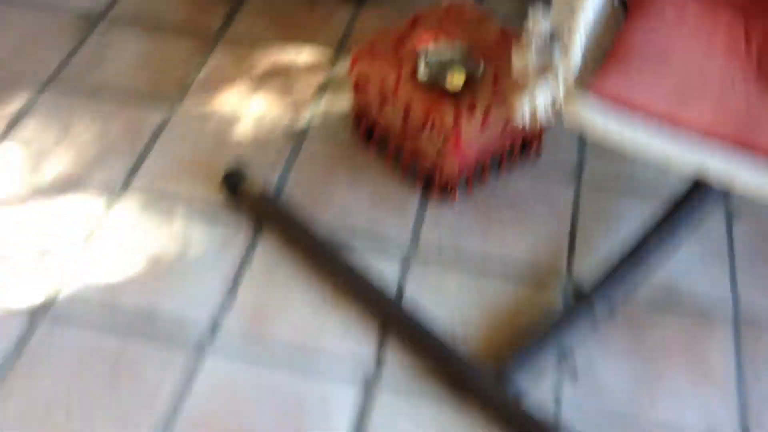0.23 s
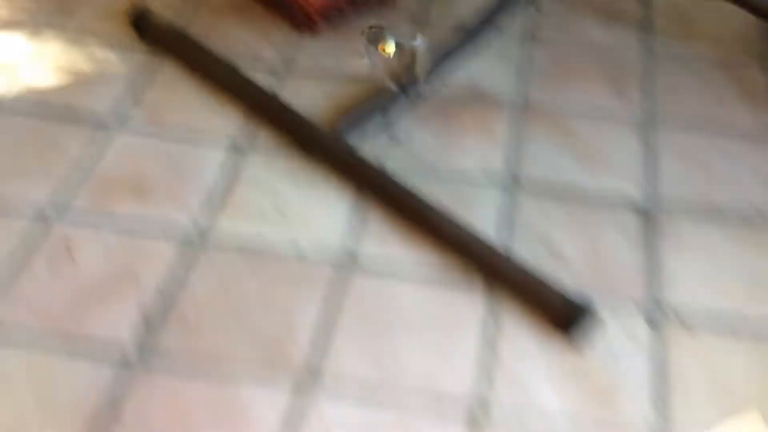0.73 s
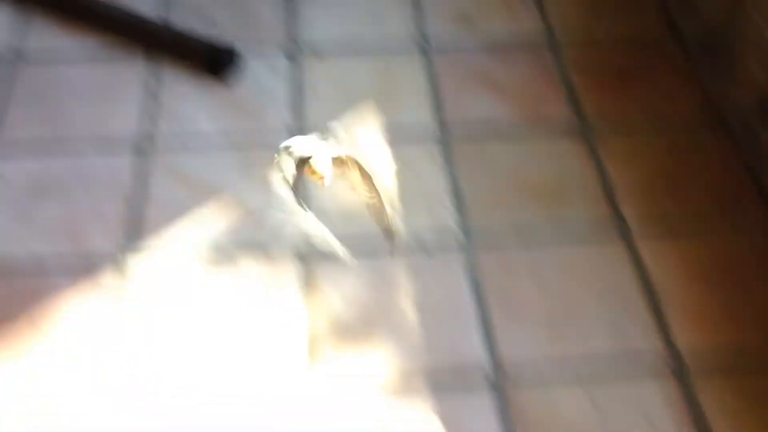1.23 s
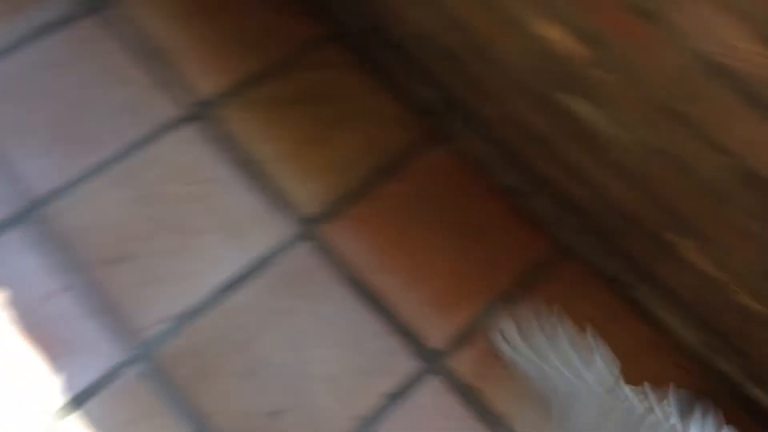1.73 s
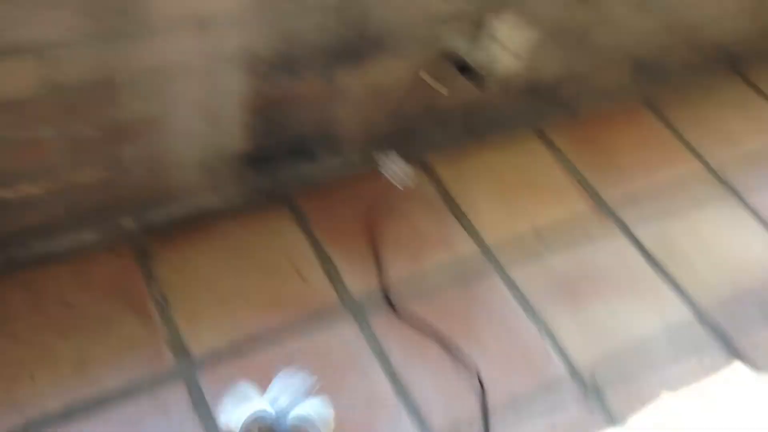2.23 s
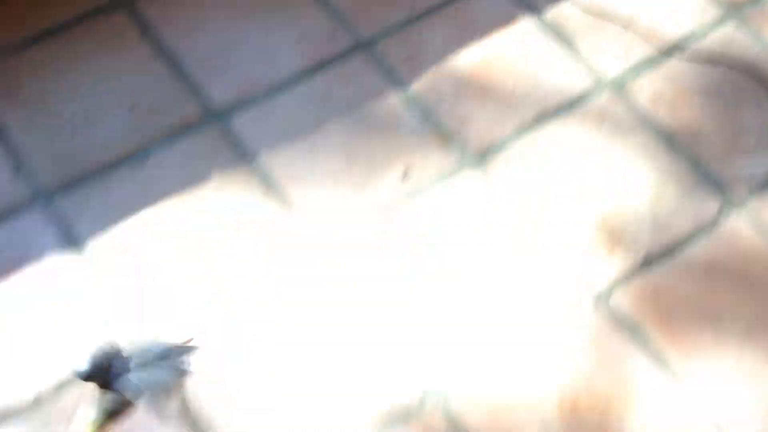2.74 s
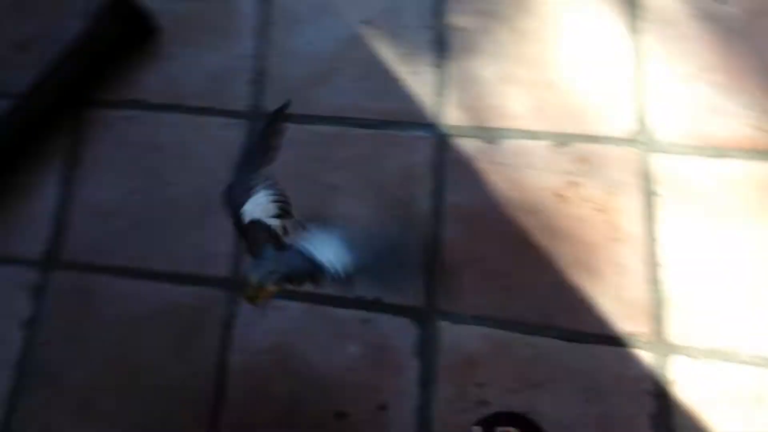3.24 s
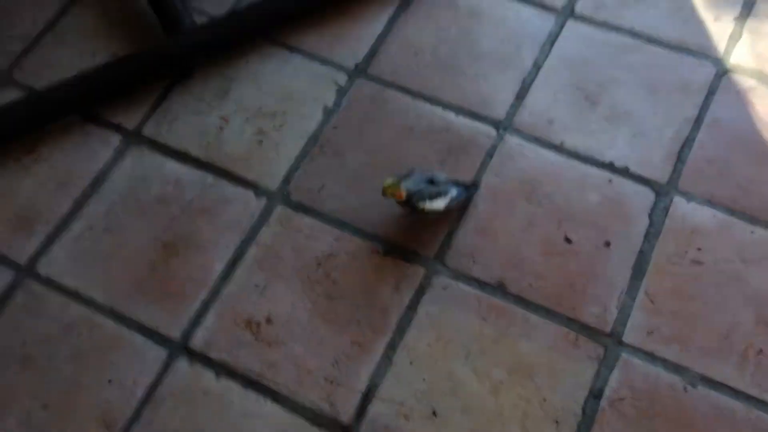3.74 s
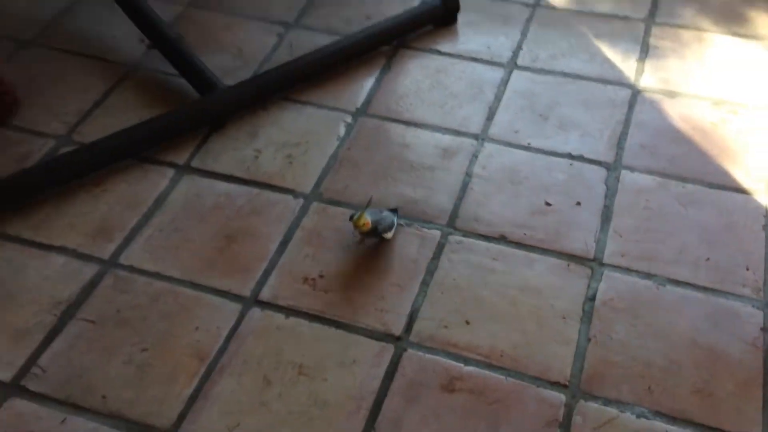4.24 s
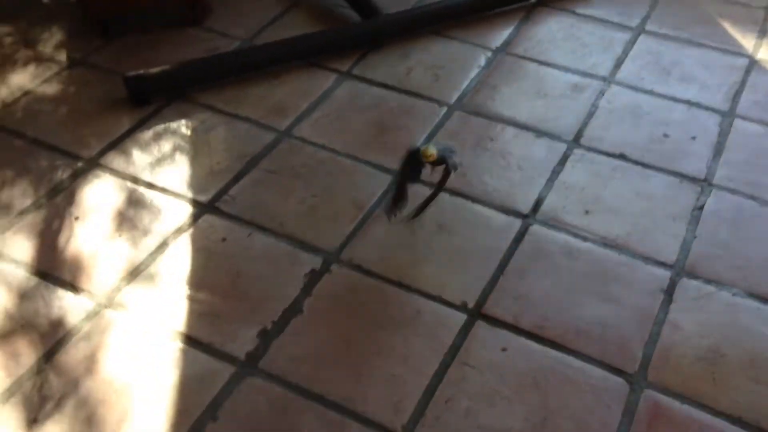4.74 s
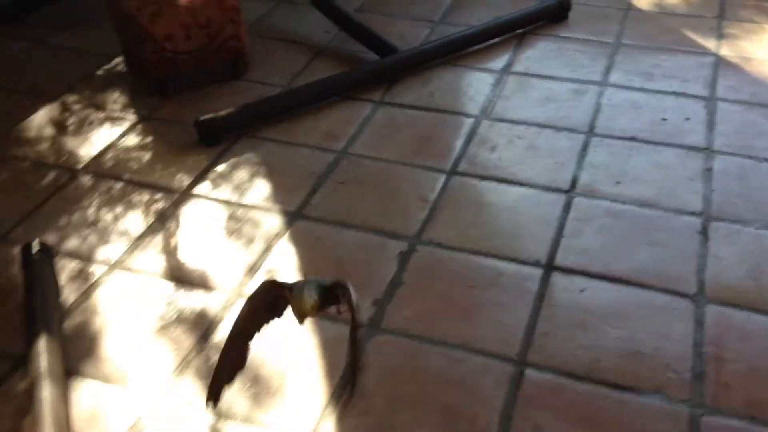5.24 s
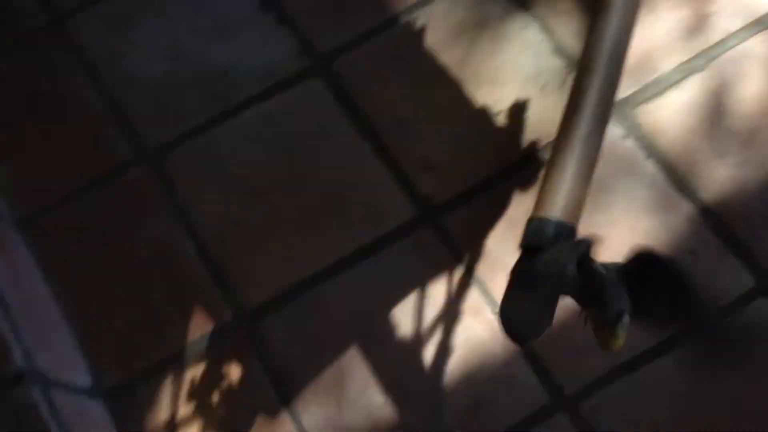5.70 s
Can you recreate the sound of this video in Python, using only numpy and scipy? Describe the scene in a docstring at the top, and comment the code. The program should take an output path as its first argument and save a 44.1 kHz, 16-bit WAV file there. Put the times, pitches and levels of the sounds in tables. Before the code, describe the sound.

Soft sandal steps shuffle and scrape across an echoing tiled porch, heard from a handheld microphone. A cockatiel chirps right at the start, then flutters by closely, its wings swishing and puffing air. After more steps and a sandal slap it chirps again, a clean whistle breaking into a rasp. A sharper slap and one tiny sole squeak follow, over quiet outdoor air, low hum, hand rumble and a far engine.

```python
"""A cockatiel chirps twice on a tiled, echoing porch, each clean whistle breaking into a rasp.
Between the chirps it flaps close past, with swishing feathers and low puffs of air.
Someone in sandals follows it: the soles pad and scuff over the tiles, slap down twice, popping out
trapped air, and squeak once. Underneath lie outdoor air, a faint hum, a far engine and the rumble
of a hand moving the microphone."""
import sys
import numpy as np
from scipy import signal
from scipy.fft import rfft, irfft, next_fast_len
from scipy.io import wavfile
from scipy.ndimage import uniform_filter1d

SR = 44100
rng = np.random.default_rng(int(sys.argv[2]) if len(sys.argv) > 2 else 0)


def pcm_store(signal):
    """Save signal as 16-bit PCM."""
    levels = np.round(np.clip(np.atleast_2d(signal), -1, 1) * 32767)
    wavfile.write(sys.argv[1], SR, levels.astype(np.int16).T)


N = 263277
TIME = np.arange(N) / SR

# the tune of the bird, one list per chirp (time [s], pitch [Hz])
CHIRP_PITCH = [
    [(.12, 1603), (.158, 1782), (.195, 1558), (.225, 1734), (.268, 1860), (.286, 1740), (.325, 1990)],
    [(4.097, 2178), (4.114, 1861), (4.19, 1883), (4.203, 1637), (4.228, 1684), (4.25, 1836), (4.275, 1752),
     (4.295, 1746)],
]
# its loudness, one list per chirp (time [s], lowest tone [dB], octave above [dB])
CHIRP_LEVEL = [
    [(.125, -51, -62), (.156, -36.5, -42), (.177, -37, -28.5), (.2, -38.5, -39), (.265, -44, -38.5),
     (.282, -48, -60), (.295, -36.5, -42.5), (.335, -36, -51.5)],
    [(4.075, -51, -80), (4.115, -29.5, -37.5), (4.136, -30.5, -47.5), (4.15, -47, -35.5),
     (4.175, -35.5, -62.5), (4.2, -46.5, -50), (4.226, -45, -48), (4.252, -30.5, -55), (4.29, -39.5, -41)],
]
# how each chirp turns rough (time [s], roughness [0-1], flutter at full roughness [x pitch], echo [dB])
CHIRP_BREAKS = [(.205, 0.6, 0.113, -6), (4.215, 0.64, 0.056, -4.5)]
# weak high tones of the bird's throat (multiple of the pitch, level against the octave [dB])
OVERTONES = [(3, -19.5), (4, -39), (5, -46), (6, -33), (7, -30), (8, -35)]
# wingbeats close to the microphone (time [s], relative dull rustle [dB], relative bright swish [dB])
WINGBEATS = [(1.728, -53, -51.5), (1.838, -51, -53.5), (1.93, -51.5, -51.5), (2.06, -54.5, -49),
             (2.174, -61, -45), (2.269, -52.5, -49), (2.385, -58.5, -63.5)]
# puffs of air on the microphone, mostly from the wings (time [s], level [dB])
PUFFS = [(1.146, -43.5), (1.576, -44.5), (1.803, -39.5), (1.847, -40.5), (1.903, -39.5), (1.95, -37.5),
         (3.638, -43)]

# rubs of soles and cloth (peak time [s], swell [s], relative scrape [dB], relative brush [dB])
SCUFFS = [(.007, 0.04, -56.5, -46.5), (.24, 0.18, -52.5, -51.5), (0.382, 0.022, -54.5, -50.5),
          (.915, 0.15, -54, -47), (1.51, 0.25, -51.5, -51), (2.578, 0.11, -55, -44.5),
          (2.863, 0.0092, -54, -47.5), (2.93, 0.089, -58, -47.5), (3.101, .028, -49, -41),
          (3.208, 0.037, -63, -53.5), (3.335, 0.037, -46.5, -50.5), (3.76, 0.027, -59.5, -52.5),
          (4.01, .11, -53, -45.5), (4.298, 0.0094, -34.5, -56), (5.149, 0.0091, -52, -57),
          (5.26, 0.03, -49, -48.5), (5.301, 0.014, -38, -54), (5.361, 0.1, -48.5, -49.5),
          (5.53, 0.15, -62, -58), (5.632, .011, -64, -54), (5.739, .016, -52.5, -49.5),
          (5.86, 0.12, -60, -56.5)]
# tone colour of a dull scrape and of a bright brush (frequency [Hz], relative level [dB])
SCRAPE_COLOUR = [(200, -19), (500, -21), (900, -5.5), (1600, 1), (2200, 0), (2900, -3), (4200, -3.5),
                 (7000, -18), (15000, -43)]
BRUSH_COLOUR = [(1100, -26), (1600, -5.5), (2200, 0.5), (3100, -2), (4500, 0.5), (6500, 0.5), (10000, -4.5),
                (15000, -15)]
# soft footsteps (time [s], heel tap [dB], thud [dB], thud pitch [Hz])
STEPS = [(.647, -33, -35, 282), (1.248, -33, -44, 300), (1.844, -35.5, -43, 436), (1.967, -49, -35.5, 303),
         (2.255, -45, -39.5, 337), (2.488, -57, -37.5, 300), (2.548, -26, -34, 358),
         (2.6603, -40, -26, 340), (2.755, -41, -36, 413), (3.796, -35.5, -65, 330),
         (5.724, -45, -35.5, 234)]
# brief narrow rasps near 2.2 kHz, on a wingbeat and on two scuffs (time [s], level [dB])
RASPS = [(2.18, -56), (3.095, -43.5), (4.045, -47.5)]
# hard sandal slaps; thump, sole and crack are set against the pop of air (time [s], relative level [dB],
# pop pitch [Hz], pop width [Hz], thump [dB], sole ring [dB], crack [dB], bass cut [Hz])
SLAPS = [(3.3313, -12.5, 860, 460, -10.5, -7.5, -10, 280), (4.3005, -3, 1230, 680, -11.5, -21, -12, 610)]

# tone colour of the outdoor air and of the hand's rumble (frequency [Hz], relative level [dB])
AIR_COLOUR = [(15, -28), (25, -1), (227, -3), (349, -1.5), (445, -9.5), (582, -2), (1140, -11.5),
              (2010, -13.5), (2700, -17), (3340, -16.5), (4260, -19.5), (6210, -24.5), (7300, -26),
              (9050, -28), (15500, -31)]
RUMBLE_COLOUR = [(25, -45), (45, -1.5), (80, 2), (160, -5), (330, -5), (600, -9.5), (1200, -30)]
# how strongly the hand moves (time [s], relative level [dB])
MOVEMENT = [(0, -56.5), (.7, -50.5), (1.6, -55), (1.9, -44.5), (2.17, -59.5), (2.6, -43.5), (3.05, -54.5),
            (4.3, -51.5), (5.55, -62), (5.75, -47.5), (5.97, -60)]
# tones of the hum (pitch [Hz], average level [dB])
HUM = [(120.5, -63.5), (282, -73.5), (329, -70.5), (361, -69), (547, -68)]
# a far engine gathering speed (time [s], firing pitch [Hz], level [dB])
ENGINE = [(3.7, 193, -71), (4.2, 206.2, -58.5), (4.65, 223.6, -62), (4.9, 229, -72)]
# how long the porch rings; "t60" is the time to fade by 60 dB (frequency [Hz], t60 [s])
PORCH_T60 = [(150, 0.23), (600, 0.4539), (1500, 0.62), (3500, 0.6464), (8000, 0.49), (15000, 0)]
# tone colour of its echo (frequency [Hz], relative level [dB])
PORCH_COLOUR = [(100, -14), (400, -3), (620, 0), (820, -4.5), (1000, -3), (1250, -2.5), (1750, 1.5),
                (2200, -9), (3200, 1.5), (7000, -1.5), (15000, 11)]


def from_db(db):
    """Turn decibels into a gain."""
    return 10 ** (np.asarray(db) / 20)


def rms_one(x):
    """Scale to an average power of one."""
    return x / np.sqrt(np.mean(x ** 2) + 1e-20)


def in_time(rows):
    """One curve over time per column, its points joined by straight lines."""
    times, *columns = np.transpose(rows)
    return [np.interp(TIME, times, column) for column in columns]


def during(rows, fade_s):
    """One while a table lasts, fading to zero outside it."""
    outside = np.maximum(rows[0][0] - TIME, TIME - rows[-1][0])
    return np.clip(1 - outside / fade_s, 0, 1)


def at_hz(points, hz):
    """Read a table at any frequency, with octaves evenly spaced."""
    known_hz, values = np.transpose(points)
    return np.interp(np.log(np.maximum(hz, 1)), np.log(known_hz), values)


def drift(rate_hz, hop=40):
    """A smooth random wobble of typical size one."""
    pole = np.exp(-2 * np.pi * rate_hz * hop / SR)
    noise = rng.standard_normal(N // hop + 2002)
    slow = signal.lfilter([1], [1, -2 * pole, pole * pole], noise)[2000:]   # let the filter settle
    return np.interp(np.arange(N) / hop, np.arange(len(slow)), rms_one(slow))


def coloured(noise, colour):
    """Give a noise its tone colour, at power one."""
    size = next_fast_len(N)
    hz = np.fft.rfftfreq(size, 1 / SR)
    gain = from_db(at_hz(colour, hz)) * (hz > 20)
    return rms_one(irfft(rfft(noise, size) * gain, size)[:N])


def band(x, low_hz, high_hz, order=2):
    """Let through what lies between two frequencies."""
    return signal.sosfilt(signal.butter(order, [low_hz, high_hz], "band", fs=SR, output="sos"), x)


def ring(hz, t60, rise_s):
    """A tone that swells quickly and dies away; peak one."""
    t = TIME[:SR // 5]
    wave = np.sin(2 * np.pi * hz * t) * from_db(-60 * t / t60) * (1 - np.exp(-t / rise_s))
    return wave / np.abs(wave).max()


def click(low_hz, high_hz):
    """A click between two frequencies; peak one."""
    wave = band(signal.unit_impulse(SR // 5), low_hz, high_hz)
    return wave / np.abs(wave).max()


def stroke(peak_s, swell_s, fade_s):
    """The power of a rub that swells to one and fades."""
    from_peak = np.maximum((peak_s - TIME) / swell_s, (TIME - peak_s) / fade_s)
    return np.exp(-2 * from_peak.clip(0, 12))


def add(track, start_s, wave):
    """Mix a sound into a track at a given time."""
    start = round(start_s * SR)
    track[start:start + len(wave)] += wave[:max(N - start, 0)]


def evened(echo, fine_hz=30, broad_hz=260):
    """Many overlapping resonances leave no single pitch standing out."""
    spectrum = rfft(echo, 2 * SR)   # two points per hertz
    power = np.abs(spectrum) ** 2
    fine, broad = (uniform_filter1d(power, 2 * hz).clip(1e-12) for hz in (fine_hz, broad_hz))
    return irfft(spectrum * np.sqrt(broad / fine))[:len(echo)]


def porch_echo(first_s=0.0011, build_s=0.013, early_db=4, early_s=0.048, lump_db=1.5):
    """Strong early echoes off tiles and wall blur into a tail whose bass and top fade first."""
    t = TIME[:SR]
    noise = rng.standard_normal((2, SR)) * from_db(lump_db * drift(160)[:SR])
    edges_hz, tail = np.geomspace(60, 16000, 25), 0
    for k, (low, high) in enumerate(zip(edges_hz, edges_hz[1:])):
        hz = np.sqrt(low * high)
        level_db = at_hz(PORCH_COLOUR, hz) - 60 * t / at_hz(PORCH_T60, hz)
        tail += band(noise[k % 2], low, high) * from_db(level_db)
    build_up = np.sqrt(np.clip((t - first_s) / build_s, 0, 1))
    early_boost = from_db(early_db * np.exp(-(t / early_s) ** 2))
    tail = evened(tail * build_up * early_boost)
    return tail / np.sqrt(np.sum(tail ** 2))


def background(air_db=-57, rumble_db=-5, waver_db=2):
    """Outdoor air, a wavering hum and the rumble of the moving hand."""
    air = from_db(air_db) * coloured(rng.standard_normal(N), AIR_COLOUR)
    hum = 0
    for hz, db in HUM:
        level = from_db(db + waver_db * drift(2))
        phase = 2 * np.pi * hz * TIME + .5 * drift(1.5)
        hum += np.sqrt(2) * level * np.sin(phase)
    rumble = from_db(in_time(MOVEMENT)[0] + rumble_db) * coloured(rng.standard_normal(N), RUMBLE_COLOUR)
    return air + hum + rumble


def sole_strokes(longest_fade_s=0.085, drag_db=-22.5, drag_s=0.13):
    """Strokes for rubbing(): scuffs, the quick ones fading sooner, and a drag after each heel tap."""
    scuffs = [(s, swell_s, min(longest_fade_s, 1.29 * swell_s), dull_db, bright_db)
              for s, swell_s, dull_db, bright_db in SCUFFS]
    drags = [(s, .003, drag_s, tap_db + drag_db, tap_db + drag_db - 13) for s, tap_db, _, _ in STEPS]
    return scuffs + drags


def rubbing(strokes, scrape_db=1.5, brush_db=-1, grain_db=1.5, slip_db=1.63):
    """Soles, cloth and feathers rub in strokes, each a run of uneven slips and tiny grains."""
    scrape_power, brush_power = np.zeros((2, N))
    for s, swell_s, fade_s, dull_db, bright_db in strokes:
        power = stroke(s, swell_s, fade_s)
        scrape_power += power * from_db(dull_db + scrape_db) ** 2
        brush_power += power * from_db(bright_db + brush_db) ** 2
    grains = rng.standard_normal((2, N)) * from_db(grain_db * drift(1400))
    slips = rms_one(from_db(slip_db * drift(52)))
    scrape = np.sqrt(scrape_power) * coloured(grains[0], SCRAPE_COLOUR)
    brush = np.sqrt(brush_power) * coloured(grains[1], BRUSH_COLOUR)
    return slips * (scrape + brush)


def shuffling(knocks_per_s=22, boost_db=5.5, low_hz=254, high_hz=536):
    """Shuffling sandals knock dully at random, louder when the hand moves more."""
    out, movement_db = np.zeros(N), in_time(MOVEMENT)[0]
    for when, pitch, size in rng.random((round(knocks_per_s * N / SR), 3)):
        knock = ring(low_hz + pitch * (high_hz - low_hz), t60=0.027, rise_s=0.001)
        level = size * from_db(movement_db[int(when * N)] + boost_db)
        add(out, when * N / SR, level * knock)
    return out


def chirp(pitch, level, break_at_s, roughness, flutter, flutter_hz=86, break_s=0.032, clean=0.14):
    """A whistle with a strong octave; as the bird's voice box turns rough, pitch and level flutter."""
    hz, = in_time(pitch)
    level_db, octave_db = in_time(level)
    rough = np.interp(TIME, [break_at_s - break_s / 2, break_at_s + break_s / 2], [clean, roughness])
    shake = np.sin(2 * np.pi * np.cumsum(flutter_hz * (1 + 0.0845 * drift(24.7))) / SR)
    jitter = .5 * drift(255)
    shaken_hz = hz * (1 + rough * flutter * (shake + jitter))
    phase = 2 * np.pi * np.cumsum(shaken_hz) / SR
    upper = np.sin(2 * phase) + sum(from_db(db) * np.sin(k * phase) for k, db in OVERTONES)
    tone = np.sqrt(2) * (from_db(level_db) * np.sin(phase) + from_db(octave_db) * upper)
    throb = 1 + .8 * rough * shake
    return tone * throb * during(level, fade_s=.005)


def footsteps(roll_s=0.011):
    """The heel taps, then the foot rolls flat with a dull thud; gives a track for each."""
    taps, thuds = np.zeros((2, N))
    for s, tap_db, thud_db, thud_hz in STEPS:
        add(taps, s, from_db(tap_db) * click(590, 1440))
        add(thuds, s + roll_s, from_db(thud_db) * ring(thud_hz, t60=0.032, rise_s=0.00071))
    return taps, thuds


def air_puffs():
    """Each puff of air hits the microphone with a brief low boom."""
    out = np.zeros(N)
    for s, db in PUFFS:
        add(out, s, from_db(db) * ring(hz=145, t60=.045, rise_s=0.0012))
    return out


def wing_strokes(swell_s=0.024, fade_s=0.04):
    """Strokes for rubbing(): the feathers swish once on every wingbeat."""
    return [(s, swell_s, fade_s, dull_db, bright_db) for s, dull_db, bright_db in WINGBEATS]


def rasps(low_hz=1890, high_hz=2590, grain_db=3):
    """Brief rasps of grainy noise in one narrow band, heard on a wingbeat and on two scuffs."""
    power = sum(from_db(db) ** 2 * stroke(s, swell_s=0.024, fade_s=0.024) for s, db in RASPS)
    grains = rng.standard_normal(N) * from_db(grain_db * drift(300))
    return np.sqrt(power) * rms_one(band(grains, low_hz, high_hz))


def sandal_slaps(top_hz=8600, rise_s=0.00013):
    """Air pops out from under a flat sole as the foot thumps, the sole rings and its rim cracks."""
    out = np.zeros(N)
    for s, db, pop_hz, width_hz, thump_db, sole_db, crack_db, bass_cut_hz in SLAPS:
        pop_t60 = np.log(1000) / (np.pi * width_hz)   # a wider band dies sooner
        pop = ring(pop_hz, pop_t60, rise_s)
        thump = from_db(thump_db) * ring(hz=315, t60=0.0045, rise_s=0.0012)
        sole = from_db(sole_db) * ring(hz=1620, t60=0.0037, rise_s=rise_s)
        crack = from_db(crack_db) * click(2570, 6600)
        slap = band(pop + thump + sole + crack, bass_cut_hz, top_hz)   # a small source gives little bass
        add(out, s, from_db(db) * slap)
    return out


def far_engine(octave_below_db=-5):
    """Only the engine's firing tone and the octave below it carry this far."""
    hz, level_db = in_time(ENGINE)
    phase = 2 * np.pi * np.cumsum(hz) / SR
    tone = np.sin(phase) + from_db(octave_below_db) * np.sin(phase / 2)
    return np.sqrt(2) * from_db(level_db) * during(ENGINE, fade_s=0.12) * tone


def sole_squeak(start_s=4.5095, length_s=0.0045, from_hz=6100, to_hz=8150, glide_s=0.0036, db=-30):
    """Rubber catches on the glaze: one tiny upward whistle."""
    t = TIME[:round(length_s * SR)]
    hz = np.interp(t, [0, glide_s], [from_hz, to_hz])
    whistle = np.sin(2 * np.pi * np.cumsum(hz) / SR)
    out = np.zeros(N)
    add(out, start_s, from_db(db) * np.sin(np.pi * t / length_s) * whistle)
    return out


def scene(slap_echo_db=4.5, thud_echo_db=-7, rub_echo_db=-13, chirp_echo_loss_db_per_s=19):
    """Bird and sandals are heard directly and as porch echoes; puffs and background only directly."""
    porch = porch_echo()
    short_porch = porch * from_db(-chirp_echo_loss_db_per_s * TIME[:SR])   # chirp echoes die sooner
    out = background() + air_puffs() + far_engine()
    for pitch, level, voice in zip(CHIRP_PITCH, CHIRP_LEVEL, CHIRP_BREAKS):
        break_at_s, roughness, flutter, echo_db = voice
        call = chirp(pitch, level, break_at_s, roughness, flutter)
        out += call + from_db(echo_db) * signal.fftconvolve(call, short_porch)[:N]
    rubs = rubbing(sole_strokes() + wing_strokes()) + rasps()
    taps, thuds = footsteps()
    thuds += shuffling()
    slaps, squeak = sandal_slaps(), sole_squeak()
    out += rubs + taps + thuds + slaps + squeak
    to_porch = taps + squeak + from_db(rub_echo_db) * rubs + from_db(thud_echo_db) * thuds
    to_porch += from_db(slap_echo_db) * band(slaps, 250, 8600, order=4)
    out += signal.fftconvolve(to_porch, porch)[:N]
    return out[None]


def record(dry, low_cut_hz=36, high_cut_hz=15400):
    """The small microphone loses the deepest bass; the highest treble is cut steeply."""
    thin = signal.sosfilt(signal.butter(2, low_cut_hz, "high", fs=SR, output="sos"), dry)
    return signal.sosfilt(signal.ellip(10, .2, 70, high_cut_hz, fs=SR, output="sos"), thin)


dry = scene()
out = record(dry)
pcm_store(out)
```